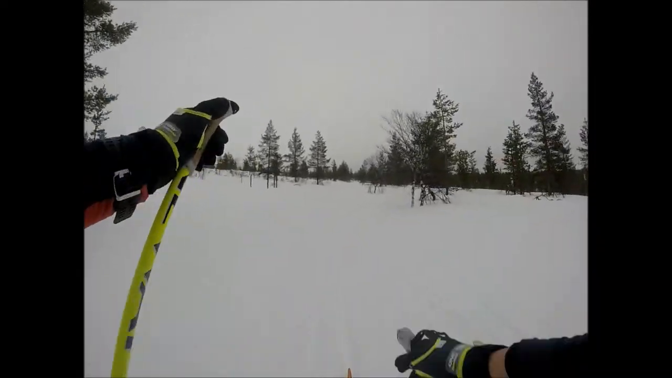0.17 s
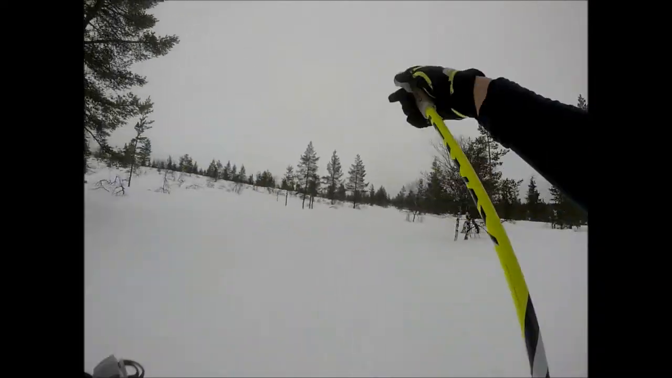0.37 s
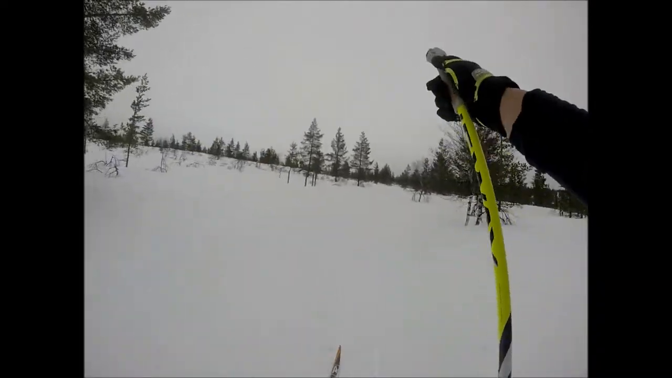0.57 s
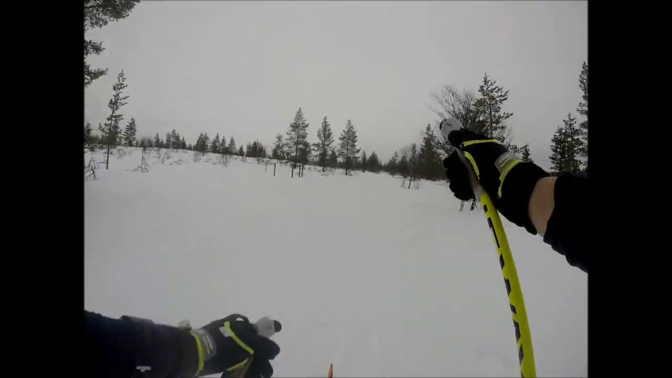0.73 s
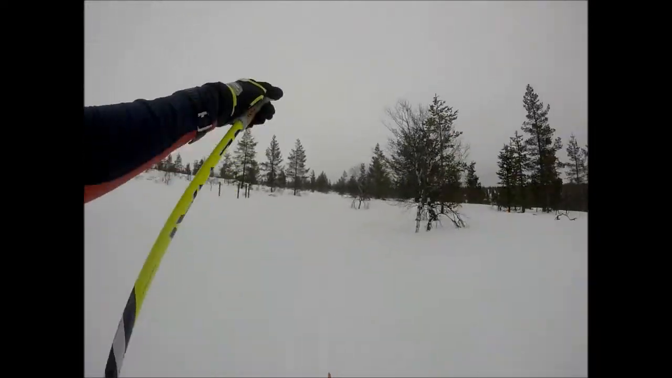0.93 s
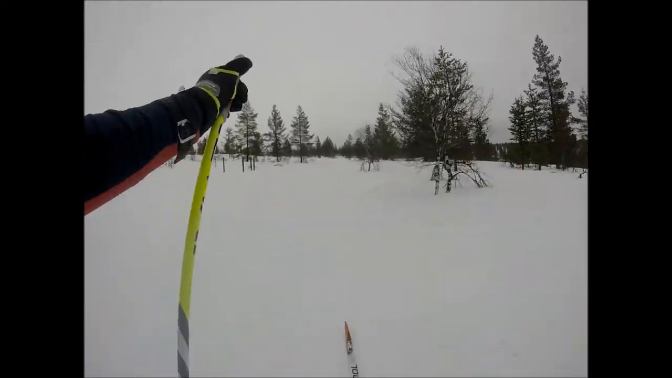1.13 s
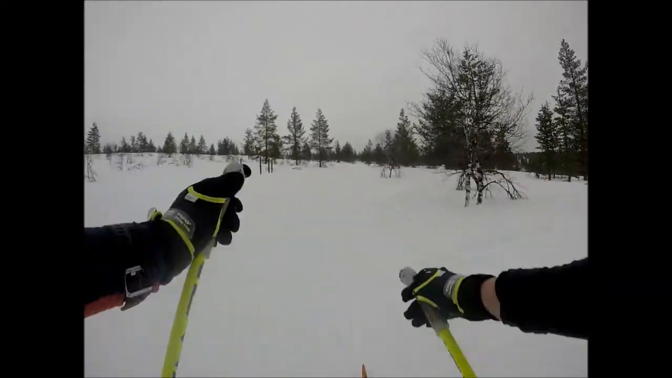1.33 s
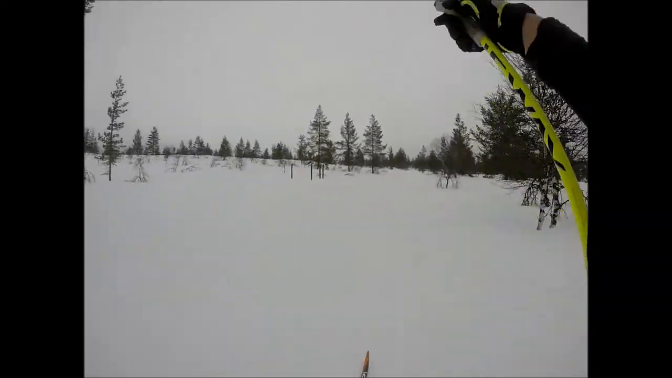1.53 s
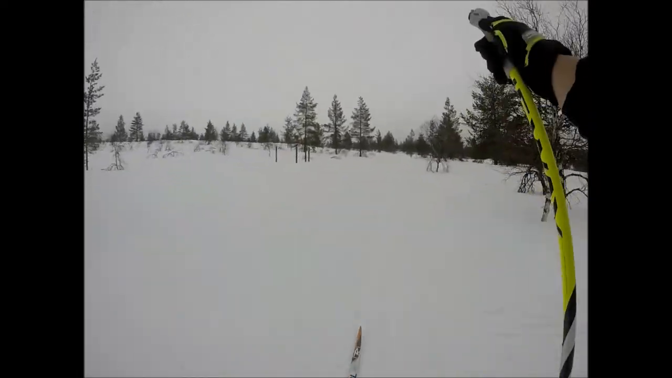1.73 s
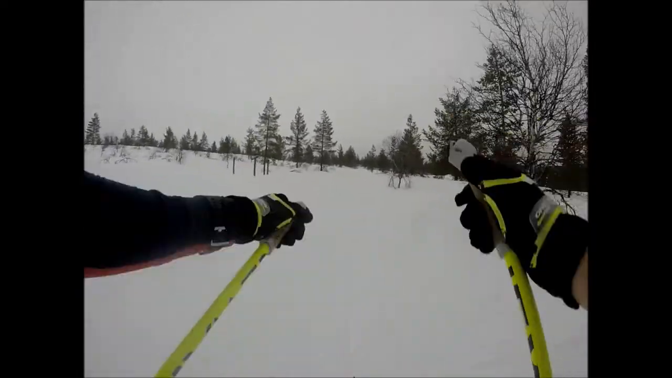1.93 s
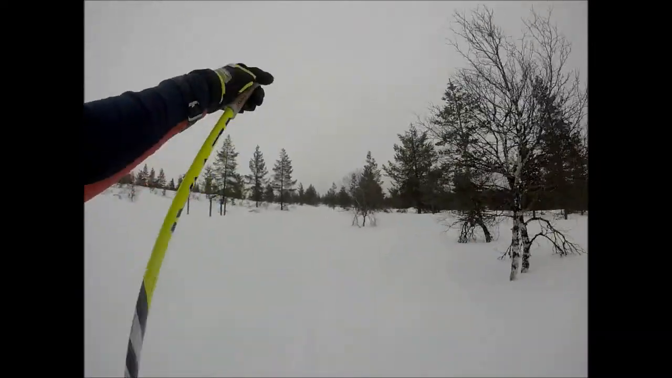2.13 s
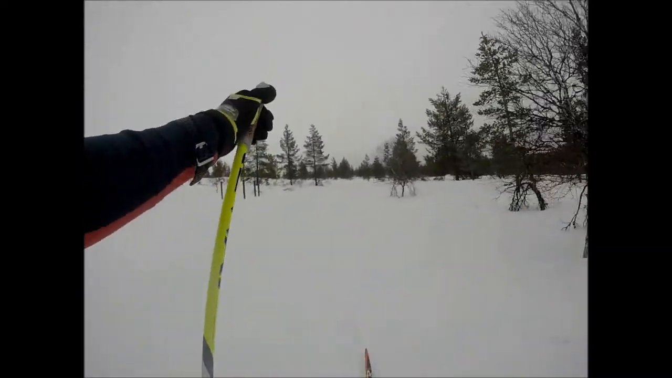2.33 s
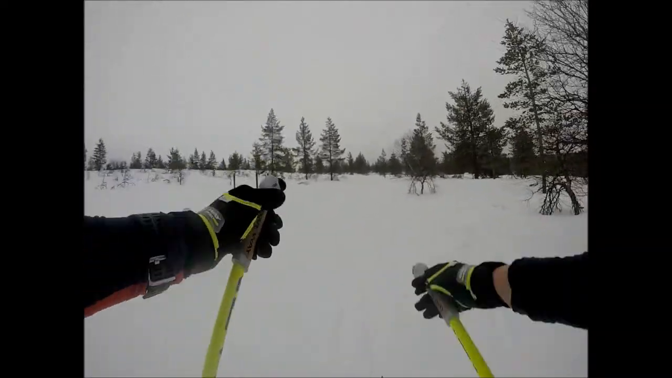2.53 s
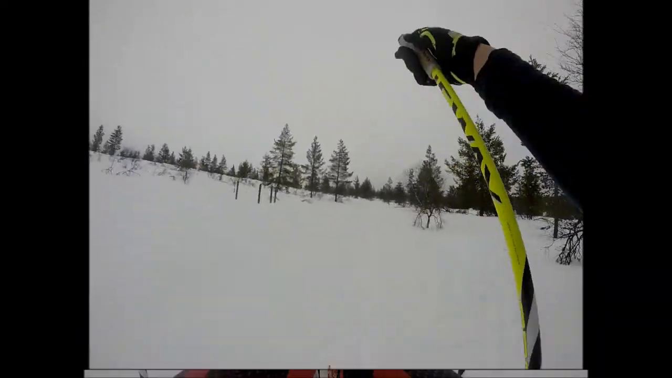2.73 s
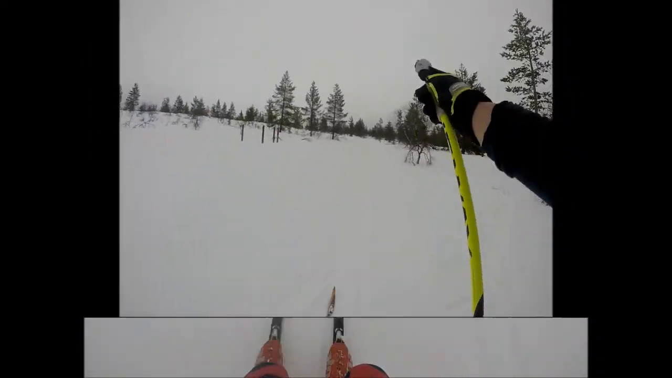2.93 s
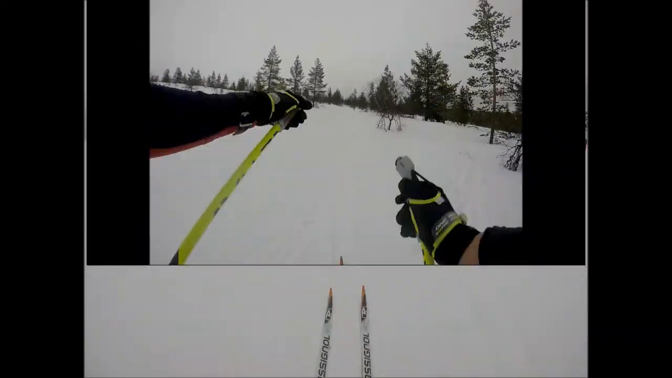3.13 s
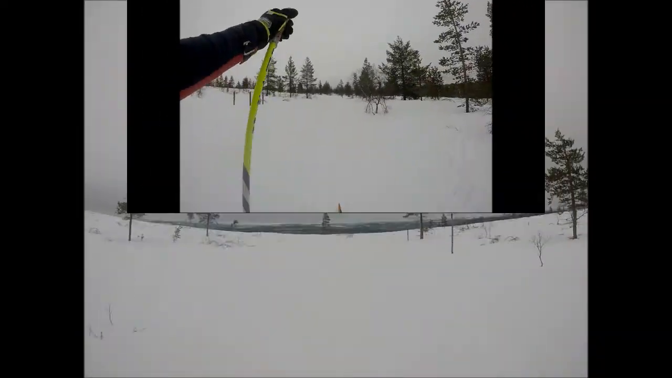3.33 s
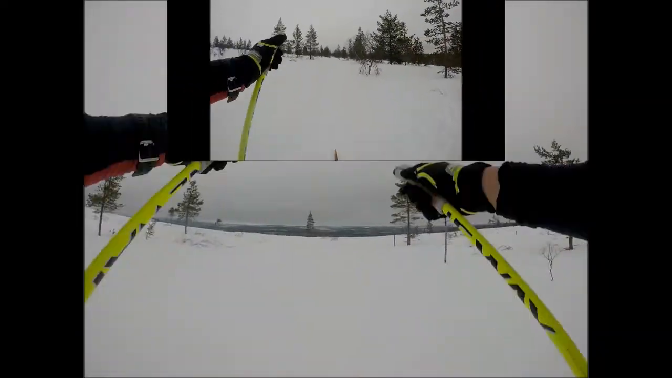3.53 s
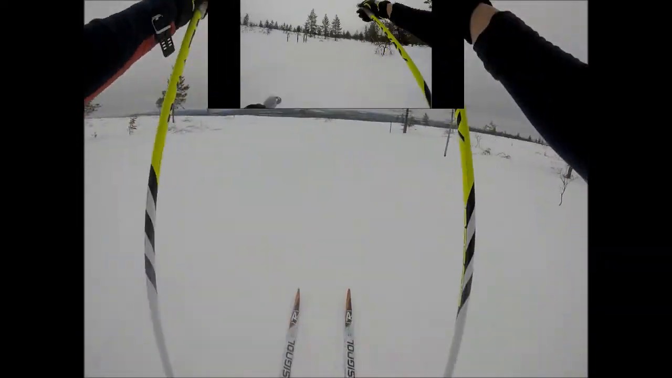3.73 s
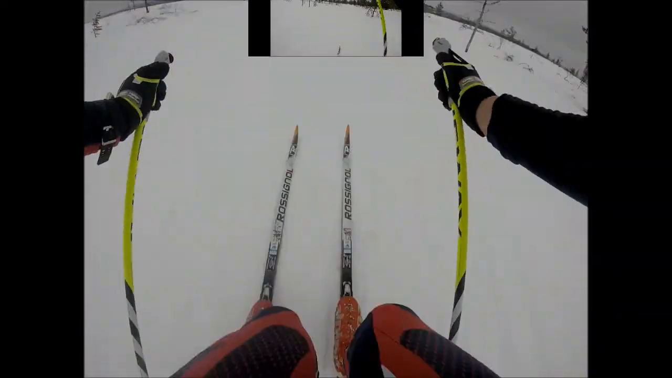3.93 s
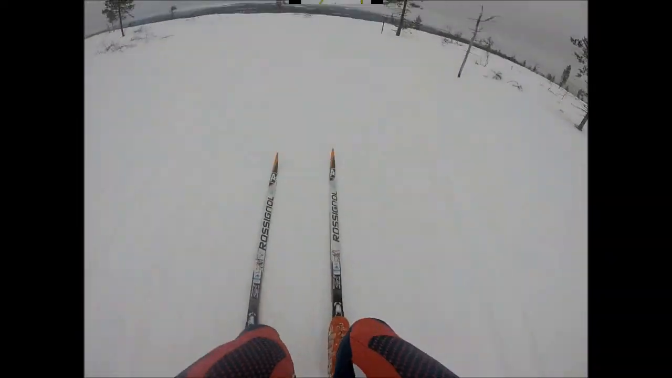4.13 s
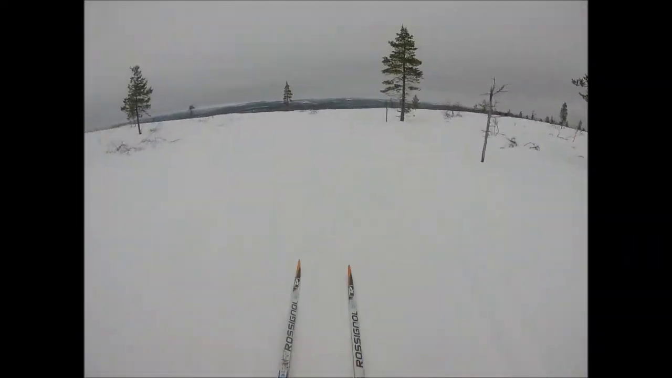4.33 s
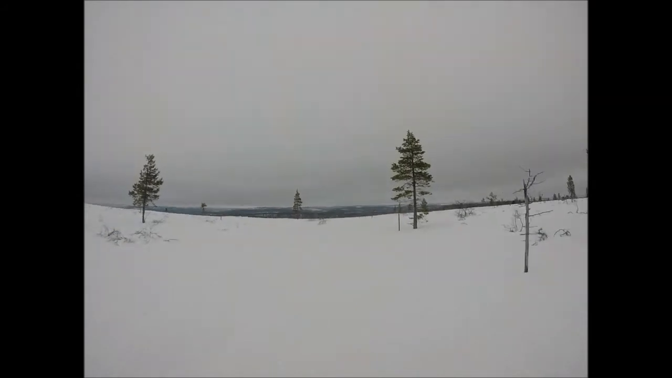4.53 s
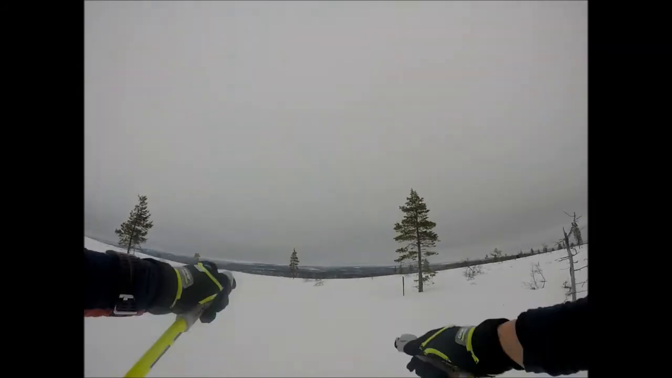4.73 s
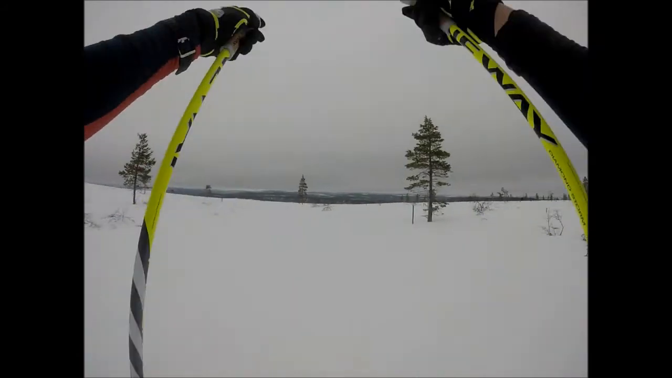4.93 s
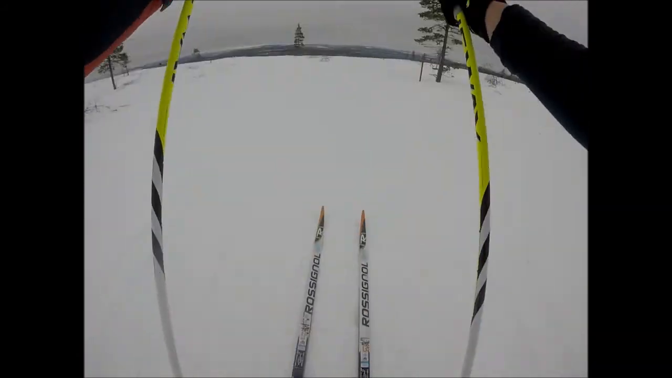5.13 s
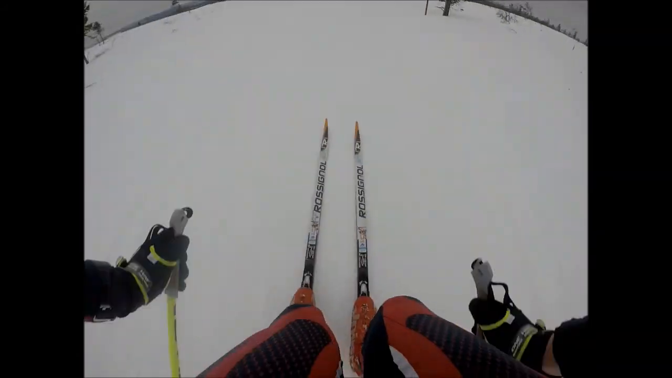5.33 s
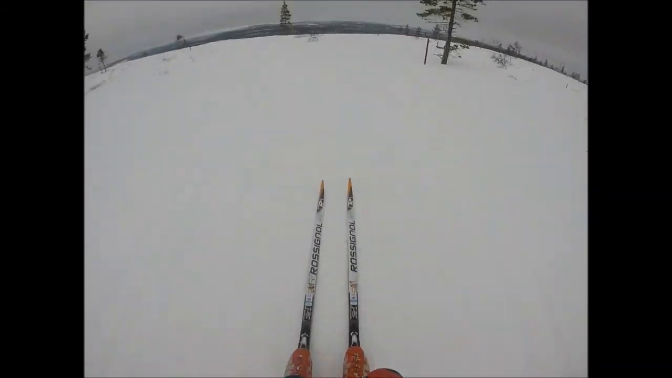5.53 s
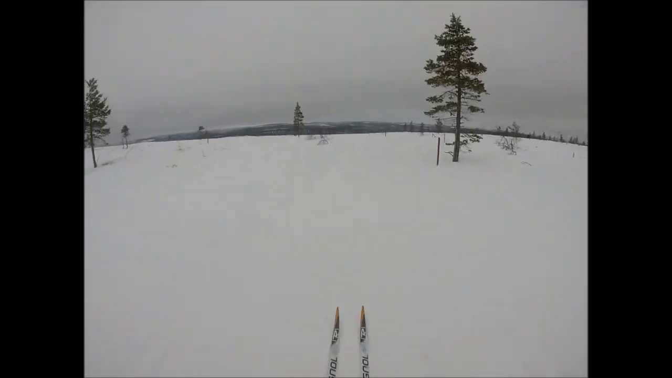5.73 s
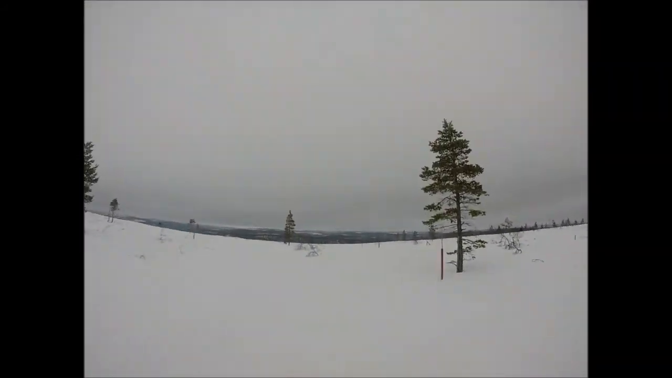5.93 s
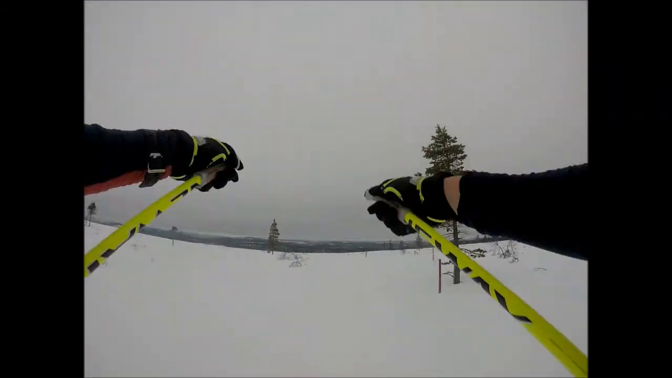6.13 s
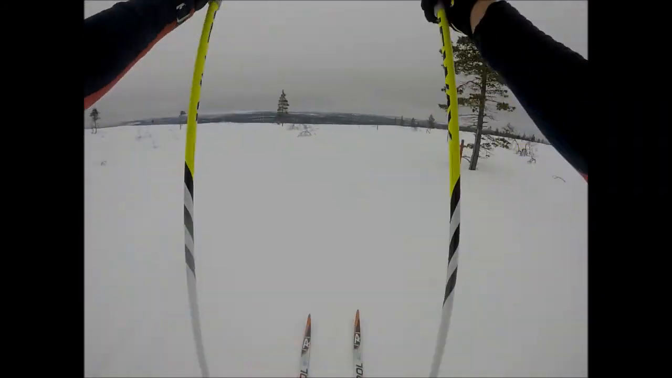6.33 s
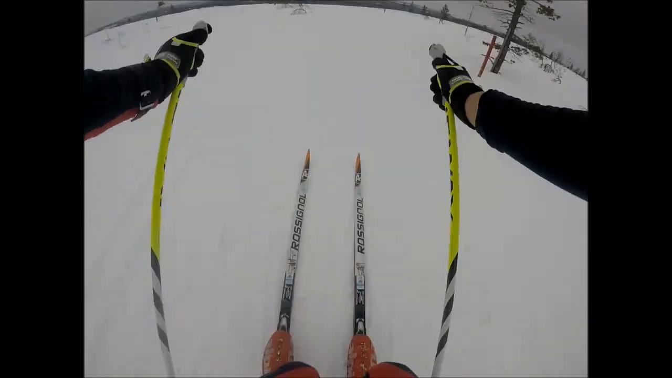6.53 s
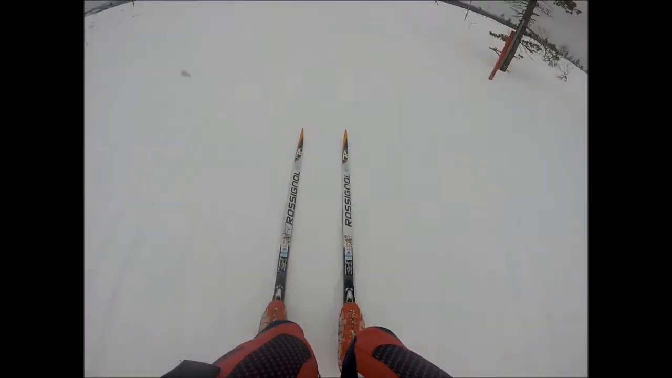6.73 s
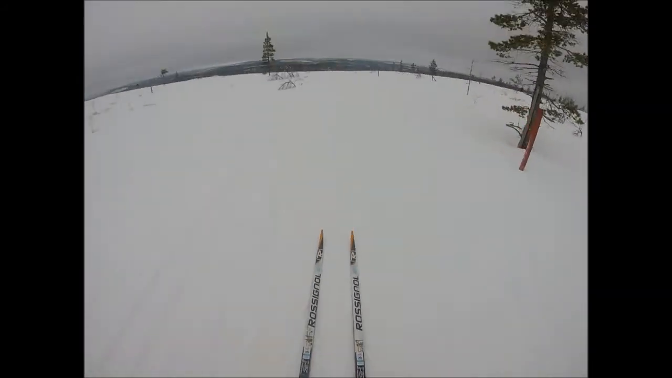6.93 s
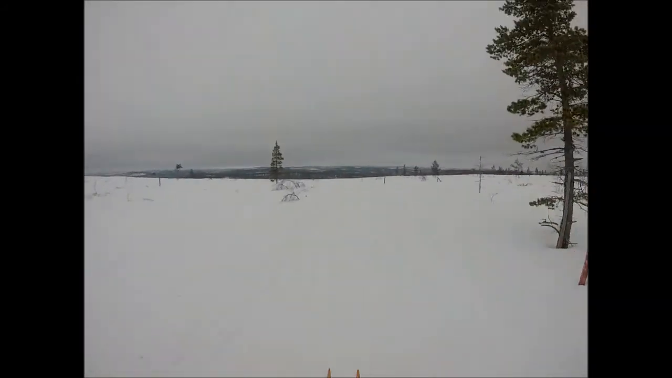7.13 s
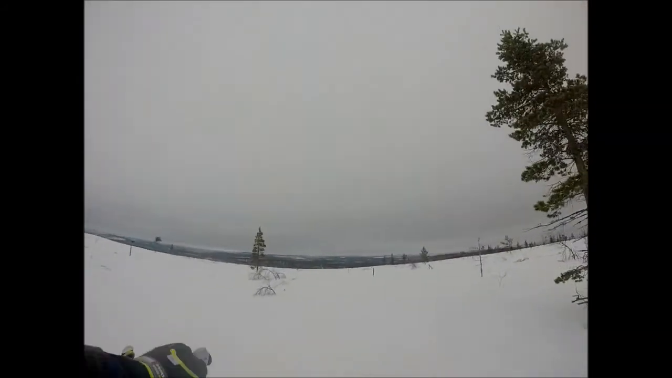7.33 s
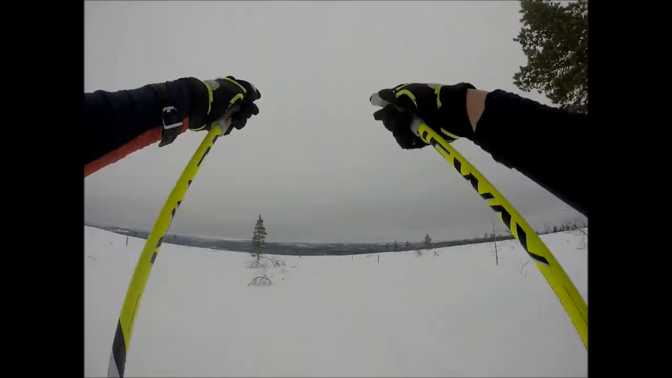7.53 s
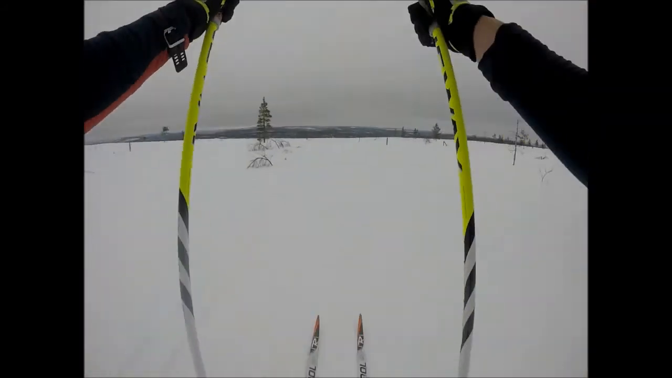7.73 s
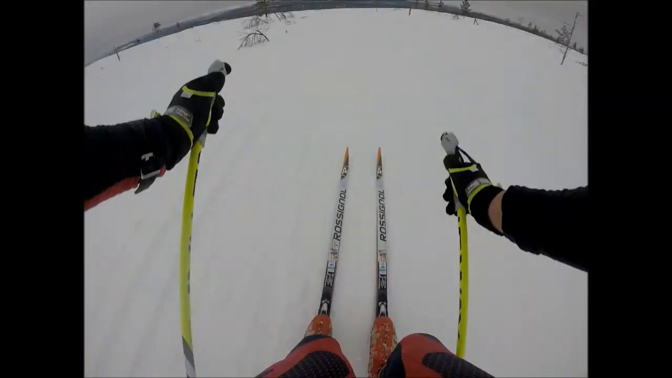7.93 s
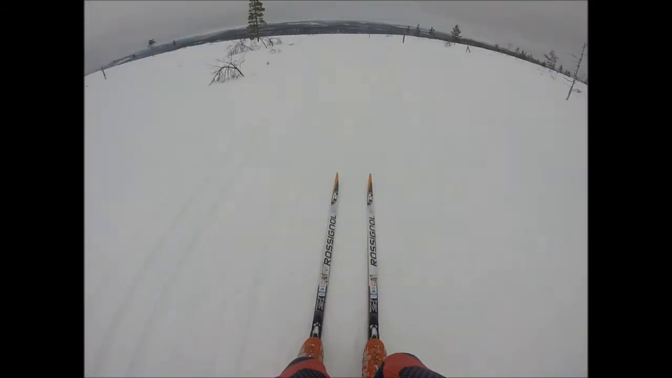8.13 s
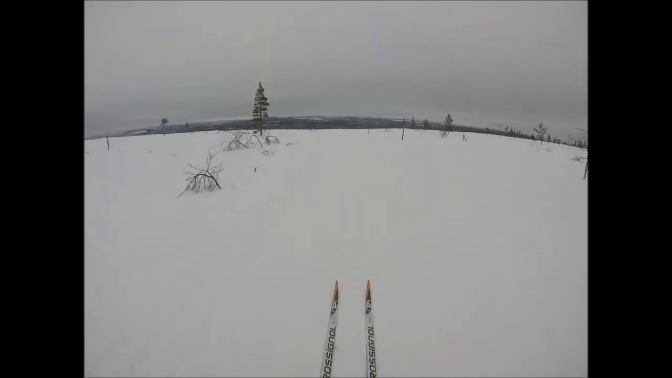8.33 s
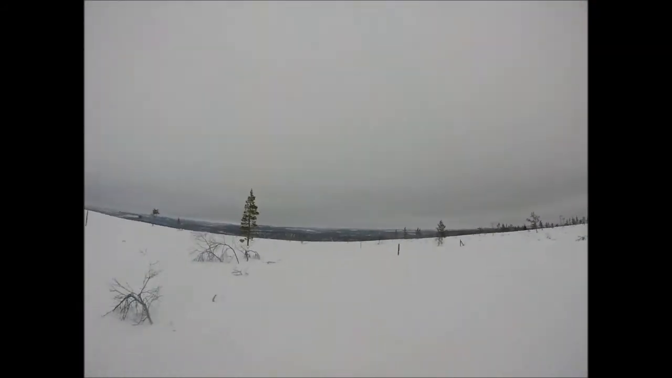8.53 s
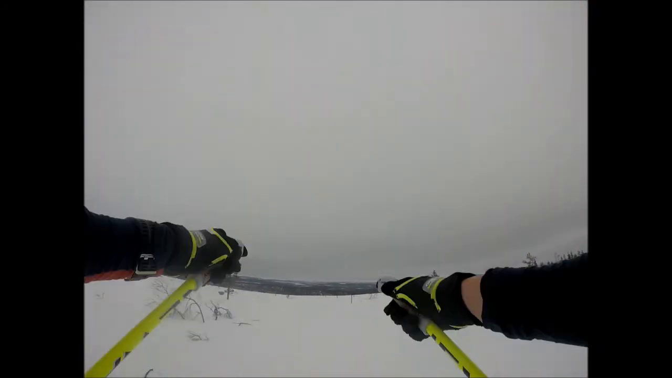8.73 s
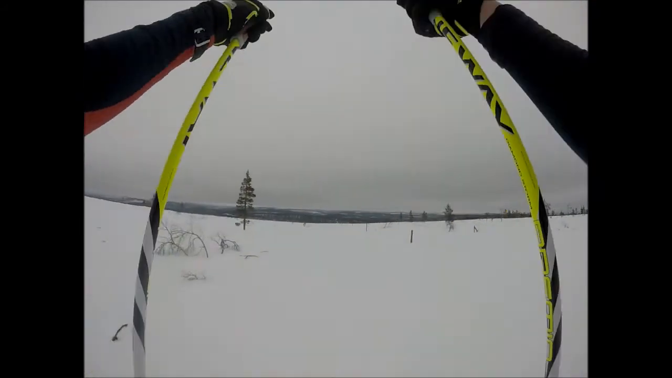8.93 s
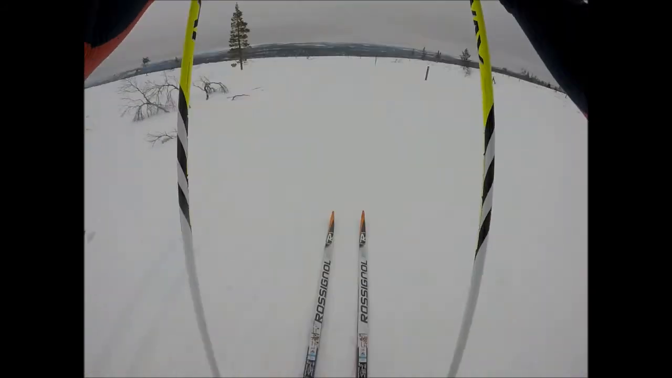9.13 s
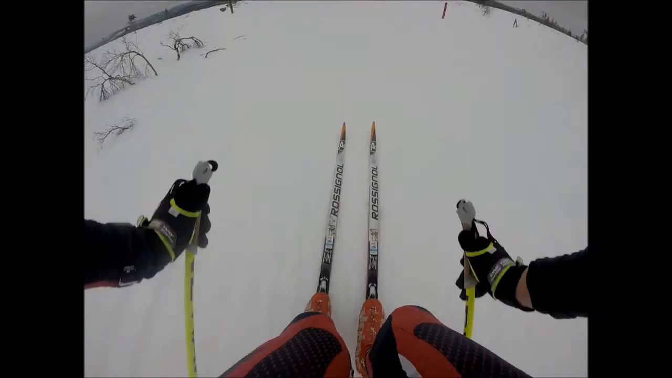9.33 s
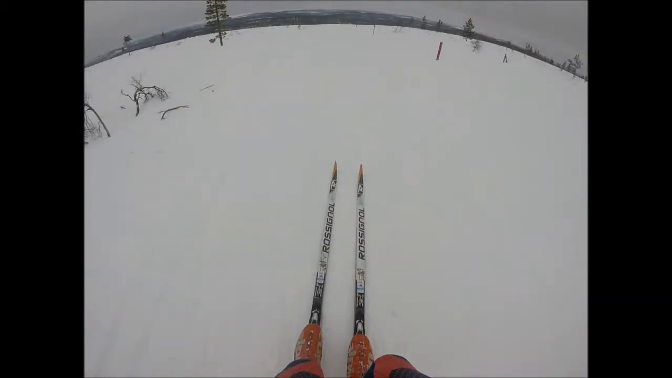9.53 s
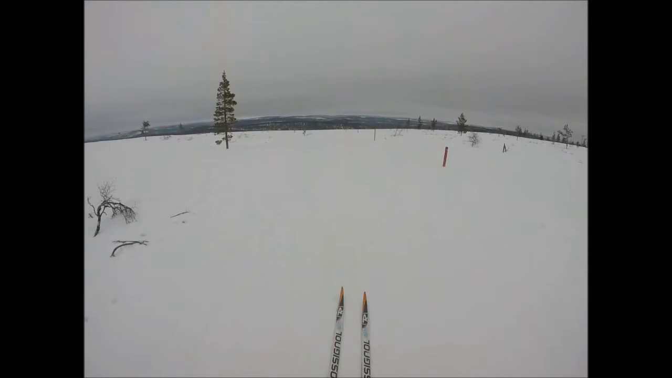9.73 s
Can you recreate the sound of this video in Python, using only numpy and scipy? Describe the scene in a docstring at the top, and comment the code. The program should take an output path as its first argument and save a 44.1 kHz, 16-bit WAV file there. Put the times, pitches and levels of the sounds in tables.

```python
"""Cross-country skis scrape, hiss and crackle along the track as a skier strides, then double-poles.
Pole tips and loaded skis crunch and squeak in the packed snow, and now and then the icy crust snaps.
Each hard push jolts a chest-strapped camera into a deep thud; gear knocks as the poles bite and lift.
Underneath, air sways against the camera and clothing rustles on its harness."""
import sys
import numpy as np
from scipy import signal
from scipy.fft import rfft, irfft, next_fast_len
from scipy.io import wavfile
from scipy.ndimage import uniform_filter1d, map_coordinates

SR = 44100
rng = np.random.default_rng(int(sys.argv[2]) if len(sys.argv) > 2 else 0)


def wav_record(signal):
    """Record a signal, one row per channel, as 16-bit PCM in the file named by sys.argv[1]."""
    frames = np.transpose(np.atleast_2d(signal))
    bounded = np.clip(frames, -1, 1)
    # unit amplitude maps onto the largest positive 16-bit level
    quanta = np.round(bounded * 32767).astype(np.int16)
    wavfile.write(sys.argv[1], SR, quanta)


N = 436149

# pushes on the poles: (time [s], effort [dB], glide hiss [dB], body movement [dB], length [s])
POLE_PUSHES = [(0.0, -2, -2, -16, 0.051), (0.517, -6, -14, -15, 0.0605), (1.07, -9, -5, -19.5, 0.096),
               (1.61, 1, -4, 3.5, 0.028), (2.255, -5.5, -1.5, -17, 0.066), (2.689, 0, 1, -1.5, 0.25),
               (3.26, -2, -3, -7, 0.097), (3.807, 1.5, -1, -1, 0.17), (5.16, -1, 1.5, -3, .15),
               (6.441, -2, -0.5, -1.5, 0.21), (7.827, 0, -0.5, -1.5, 0.18), (9.195, -6.5, -3.5, -4, 0.28)]
# colour of crunching snow, heard through the camera housing: (frequency [Hz], width [Hz], level [dB])
CRUNCH_MODES = [(1154, 120, -8.5), (1460, 150, 6), (1790, 84, 8), (2250, 480, 7), (3320, 350, 3.5),
                (3730, 280, -1.5), (4800, 430, -3), (5070, 520, -12), (6980, 510, -7.5), (7880, 360, -9.5),
                (10400, 3200, -25.5)]


def skis(crackle_top_hz=3000, snow_db=0.5):
    """The edges scrape, the bases swish and hiss; clumps of crystals crackle under the load."""
    # edges scraping under load: (frequency [Hz], level [dB])
    edge_spectrum = [(200, -10), (320, -7), (600, -10.5), (820, -9.5), (1000, -7), (1320, -2.5),
                     (1550, 0.5), (1850, -3.5), (2150, -10.5), (2600, -6), (4000, -70)]
    # bases swishing along the track: (frequency [Hz], level [dB])
    base_spectrum = [(1500, -43), (2100, -8), (2350, -0.5), (2580, 1), (3000, 0), (3330, -3.5),
                     (3650, -3.5), (4000, -8), (4600, -13), (8000, -70)]
    # fine snow hissing: (frequency [Hz], level [dB])
    powder_spectrum = [(2500, -42), (3900, -12), (4400, 4.5), (5250, -1.5), (5850, -1.5), (6400, 2.5),
                       (7100, 2.5), (7750, 5), (8300, 0.5), (9100, -6.5), (11000, -4.5), (12600, -13.5),
                       (14200, -11), (15400, -30)]
    firmness = amp(snow_db * wobble(15))  # softer and harder snow
    scrape_gain, swish_gain, hiss_gain, grit_gain = np.array(glide()) * firmness
    bumps = wobble(45)  # unevenness of the track, felt by the whole ski
    scrape = scrape_gain * amp(0.97 * bumps + 1.83 * wobble(130))
    scrape *= coloured(grains(N, rate=5000, spread_db=3), edge_spectrum)
    swish = swish_gain * amp(-3 + 1.8 * bumps)
    swish *= coloured(patchy(grains(N, rate=9000, spread_db=2.5), depth_db=0.4), base_spectrum)
    hiss = hiss_gain * amp(-3 + 1.3 * bumps + 1.3 * wobble(50))
    hiss *= coloured(patchy(rng.standard_normal(N), depth_db=2.5), powder_spectrum)
    clumps = grains(N, rate=170, spread_db=6) * amp(7 * wobble(30))
    clumps = filtered(clumps, lambda f: body(CRUNCH_MODES, f) / (1 + (f / crackle_top_hz) ** 4))
    crackle = scrape_gain * amp(-8.5) * unit(clumps)
    grit = grit_gain * gritty_ring(grains(N, rate=7000, spread_db=2), width_hz=550)
    return scrape + swish + hiss + crackle + grit


def glide():
    """Gains of scrape, swish, hiss and grit: all follow the pushes; the hiss lasts as the speed does."""
    # a ski slides out under shifting weight: (middle [s], half length [s], swish [dB], hiss [dB])
    slides = [(0.444, .03, -47, -50.5), (0.558, 0.043, -45.5, -48.5), (0.842, 0.022, -42.5, -42),
              (1.028, 0.032, -46, -48.5), (1.153, 0.011, -41, -47), (1.33, 0.016, -55, -59),
              (1.593, 0.1, -48, -49), (2.03, 0.12, -54, -52.5), (2.402, 0.021, -44.5, -53),
              (3.61, 0.11, -46.5, -67.5), (4.367, 0.037, -44.5, -51), (4.735, 0.013, -42, -72),
              (4.6, 0.07, -52, -53), (4.913, .06, -48, -58), (5.678, 0.04, -43.5, -61),
              (6.18, 0.11, -51.5, -65), (6.95, 0.056, -45, -56), (7.408, 0.11, -53.5, -68),
              (8.291, 0.026, -42.5, -51), (8.795, 0.041, -48, -58), (8.916, 0.031, -44, -67.5),
              (9.691, 0.028, -42.5, -54)]
    s, half, swish_db, hiss_db = np.transpose(slides)
    _, effort_db, speed_db, *_ = np.transpose(POLE_PUSHES)
    load = pushing(effort_db, lasting=1.48)
    speed = pushing(speed_db, lasting=5.06)
    slide = swells(s, half, swish_db)
    scrape = together(amp(-55), amp(-47.5) * load, amp(-5) * slide)  # steady bed, pushes, slides
    swish = together(amp(-53), amp(-44) * load, slide)
    hiss = together(amp(-55.5), amp(-50) * speed, swells(s, half, hiss_db))
    grit = amp(-54) * pushing(speed_db, lasting=2)
    return scrape, swish, hiss, grit


def crunches(split_hz=3900, clumping_db=2.4, ring_db=-4):
    """Packed snow gives way in clumps of tiny slips; some of them lock into a squeak."""
    # snow crushed under pole tips and skis:
    # (time [s], length [s], level [dB], relative treble [dB], squeak [Hz], squeak share [0-1])
    loud_crunches = [(0.003, 0.014, -25, -19, 2355, 0.83), (0.532, 0.028, -34, -10.5, 3110, 0.78),
                     (0.675, .045, -40, -18, 1700, .3), (1.091, 0.03, -27.5, -15, 2450, 0.4),
                     (1.3, 0.035, -42.5, -0.5, 2190, 0.16), (1.365, 0.03, -38.5, -14, 1525, 0.2),
                     (1.6438, 0.014, -24.5, -10.5, 3040, 0.82), (2.265, 0.015, -29, -10.5, 2334, 0.68),
                     (2.854, 0.027, -35.5, -9, 3100, 0.92), (2.983, 0.0066, -26.5, -11.5, 2400, 0),
                     (3.1, 0.0056, -33.5, -25, 2610, 0.06), (3.139, .025, -39, -24, 1574, .4),
                     (3.288, 0.0065, -28.5, -23, 2180, .3), (3.345, .008, -36, -18, 1500, 0.02),
                     (3.397, 0.029, -30, -11, 2447, 0.4), (3.748, 0.032, -34, -9.5, 2510, 0.4),
                     (3.892, 0.0051, -30.5, -10, 2180, .1), (3.917, 0.0086, -22.5, -11.5, 2130, 0.23),
                     (3.928, 0.03, -32.5, -8.5, 3150, 0.7), (4.058, 0.013, -33.5, -15, 2370, 0.1),
                     (4.282, .008, -30.5, -31, 1473, .85), (4.482, 0.011, -36.5, -17, 1480, .5),
                     (5.083, 0.028, -32, -8, 3060, 0.7), (5.192, 0.0064, -30.5, -25, 2220, 0),
                     (5.243, 0.014, -26, -15.5, 1816, 0.23), (5.329, 0.0073, -29.5, -28, 2250, 0.3),
                     (5.469, 0.011, -37.5, -13, 1397, 0.9), (5.808, .006, -41, -15, 1840, .6),
                     (5.835, .014, -34, -34.5, 1490, 0.47), (6.37, 0.027, -31.5, -10.5, 2930, .45),
                     (6.547, 0.0065, -21.5, -11, 2200, 0), (6.566, .006, -28.5, -24, 2190, .6),
                     (6.609, 0.016, -30, -17, 2170, 0), (6.644, .004, -33.5, -22, 1420, 0.7),
                     (6.681, 0.0052, -30, -21.5, 1460, 0.47), (6.915, .004, -36, -20, 2240, .1),
                     (7.106, 0.011, -38.5, -16, 1490, 0.57), (7.161, 0.005, -38, -15, 2270, 0.5),
                     (7.746, 0.03, -37, -8, 3080, .55), (7.846, 0.021, -35, -12, 1466, .25),
                     (7.878, 0.011, -30, -14, 1810, .3), (7.8917, 0.0054, -20, -18.5, 1510, 0.18),
                     (7.982, 0.0065, -29.5, -20, 1500, 0.15), (8.156, .003, -35, -20, 1400, .6),
                     (8.452, .016, -37, -38, 1420, 0.66), (8.465, .005, -35, -30, 1850, 0.5),
                     (8.571, 0.0069, -38, -19, 1440, 0.15), (9.089, .03, -31.5, -11, 2990, 0.53),
                     (9.225, .01, -38, -9, 2250, .2), (9.246, .023, -42, -8, 1530, .2),
                     (9.286, .003, -34, -8, 1510, 0.4), (9.311, 0.01, -32.5, -13, 2305, .4),
                     (9.354, 0.027, -36.5, -25, 1810, .35), (9.813, 0.031, -34.5, -19, 1530, 0.5),
                     (9.873, 0.0051, -29, -28, 1560, 0.92)]
    out, t = np.zeros(N), np.arange(SR // 6) / SR
    lowpass = lambda f: 1 / (1 + (f / split_hz) ** 10)
    for s, length, db, treble_db, squeak_hz, share in loud_crunches + faint_crunches():
        rise = 1 - np.exp(-t / (0.3 * length))
        fade = np.exp(-(t / (0.8 * length)) ** 1.6)
        clumps = amp(clumping_db * unit(uniform_filter1d(rng.standard_normal(len(t)), size=150)))
        load = rise * clumps * fade
        slips = load * grains(len(t), rate=15000, spread_db=4.5)
        crush = unit(filtered(slips, lambda f: body(CRUNCH_MODES, f) * lowpass(f)))
        spray = unit(filtered(slips, lambda f: body(CRUNCH_MODES, f) * (1 - lowpass(f))))
        spray += amp(ring_db) * gritty_ring(load * grains(len(t), rate=13000, spread_db=2), width_hz=170)
        tone = unit(load * squeak(t, squeak_hz))
        burst = np.sqrt(1 - share) * crush + np.sqrt(share) * tone + amp(treble_db) * spray
        add(out, s, amp(db) * np.sqrt(length / t[-1]) * burst)  # level holds over the crunch's length
    return out


def faint_crunches(idle_per_s=1.5, loaded_per_s=8, treble_db=-15, squeak_share=0.25, tries=200):
    """Rows for the small chance crumbles between the loud crunches: more and louder under load."""
    # pitches a crumble can squeak at: (frequency [Hz])
    squeak_pitches = [1464, 1835, 2264]
    load = pushing(np.transpose(POLE_PUSHES)[1], lasting=1.8)
    rows = []
    for when, chance, size, pitch, span in rng.random((tries, 5)):
        weight = load[int(when * N)]
        if chance < (idle_per_s + loaded_per_s * weight) * N / SR / tries:
            length = 0.006 * 2 ** (2 * span - 1)  # 3 to 12 ms
            db = -44 + 5 * weight + 3 * (2 * size - 1)
            squeak_hz = squeak_pitches[int(pitch * len(squeak_pitches))]
            rows.append((when * N / SR, length, db, treble_db, squeak_hz, squeak_share))
    return rows


def squeak(t, hz, waver=0.0524, overtone_db=-19):
    """Regular stick and slip: a wavering tone with a weak octave, rms 1."""
    drift = unit(uniform_filter1d(rng.standard_normal(len(t)), size=90))
    phase = 2 * np.pi * np.cumsum(hz * (1 + waver * drift)) / SR
    return unit(np.sin(phase) + amp(overtone_db) * np.sin(2 * phase))


def gritty_ring(x, width_hz, hz=5100):
    """Give snow grains a high, gritty ring, rms 1."""
    return unit(filtered(x, lambda f: resonance(f, hz, width_hz) * resonance(f, hz, 10 * width_hz)))


def crust_snaps(hz=7900, width_hz=3600, t60_s=0.009):
    """The icy crust snaps under a pole in a brief bright spray of breaking crystals."""
    # breaks in the crust: (time [s], level [dB])
    breaks = [(6.55, -23), (6.5754, -20), (7.8926, -16)]
    out, t = np.zeros(N), np.arange(SR // 20) / SR
    for s, db in breaks:
        burst = amp(-60 * t / t60_s) * rng.standard_normal(len(t))
        add(out, s, amp(db) * filtered(burst, lambda f: resonance(f, hz, width_hz) ** 2))
    return out


def mount_thuds():
    """A cushioned jolt rocks the camera on its mount; harder jolts are shorter."""
    # jolts of the mount: (time [s], impulse [dB], hardness [Hz])
    jolts = [(0.5822, 46.5, 205), (1.7112, 52, 393), (2.7285, 52, 370), (2.9237, 50, 298),
             (3.9873, 56, 340), (5.3113, 52, 330), (6.5956, 53.5, 305), (7.9378, 45, 250),
             (9.3125, 54, 290)]
    # the camera rocking on its harness: (frequency [Hz], width [Hz], gain [signed by direction])
    mount_modes = [(23.4, 19.8, 0.22), (86.5, 53.4, 0.6), (207, 136, -0.22)]
    out, impulse = np.zeros(N), signal.unit_impulse(SR // 4)
    rocking = lambda f: sum(gain * resonance(f, hz, width) for hz, width, gain in mount_modes)
    for s, db, hard_hz in jolts:
        add(out, s, amp(db) * filtered(impulse, lambda f: rocking(f) / (1 + 1j * f / hard_hz) ** 4))
    return out


def gear_knocks(seat_s=0.0009, bounce_s=0.00268, rattle_t60_s=0.094, contact_hz=4600, bass_hz=450):
    """Each knock touches, seats, bounces once and rattles a little, all ringing the gear."""
    # hits on the gear: (time [s], impulse [dB], relative bounce [dB], bass shelf [dB])
    hits = [(2.1077, -2.5, -7, -6), (2.9876, 7.5, -6.5, -3), (3.8336, 22, -7.5, -2), (4.0726, 7.5, -6, 5),
            (4.13, 6, -2, 1), (4.282, 3, -3, -4), (4.5915, -0.5, -13, 3), (5.158, 19, -11.5, -1),
            (5.475, 0.5, -6, 3), (5.7763, -3, -3.5, 5), (5.888, -1.5, -9, 8), (6.449, 18.5, -8.5, -0.5),
            (6.8046, 12, -1, -6), (7.187, -1.5, -8, 6), (7.827, 18, -7, 1), (8.0407, 3, -3, -6),
            (8.2101, 13.5, -3, -0.5), (8.5087, 0, -9, 2), (9.1614, 20, -8, 0), (9.4718, 11.5, -0.5, 2),
            (9.5994, -2, -6, 4)]
    # the ring of the gear: (frequency [Hz], width [Hz], level [dB])
    gear_modes = [(137, 35, 3), (297, 91, -1.5), (565, 145, -5.5), (988, 73, -6.5), (1267, 89, -3.5),
                  (1706, 120, 3), (2420, 445, 1), (2584, 530, -0.5), (3660, 140, -12), (4500, 410, -28),
                  (7640, 710, -28)]
    blows, t = np.zeros(N), np.arange(SR // 10) / SR
    for s, db, bounce_db, bass_db in hits:
        blow = amp(-36 - 60 * t / rattle_t60_s) * rng.standard_normal(len(t))  # rattle
        blow[0] += 1  # first touch
        blow[round(seat_s * SR)] += amp(-4)
        blow[round(bounce_s * SR)] += amp(bounce_db + rng.normal(0, 3.8))
        bass_shelf = lambda f: 1 + (amp(bass_db) - 1) / (1 + 1j * f / bass_hz)
        add(blows, s, amp(db) * filtered(blow, bass_shelf))
    # a blunt contact gives little treble
    return filtered(blows, lambda f: body(gear_modes, f) / np.sqrt(1 + (f / contact_hz) ** 4))


def air_and_cloth():
    """Air sways against the camera and clothing rubs its harness; both grow with each push and lurch."""
    # lurches of the skier's chest: (middle [s], half length [s], sway [dB], rustle [dB])
    lurches = [(0.198, .025, -32.5, -65), (0.846, 0.02, -30, -55), (1.17, 0.034, -34.5, -50),
               (1.47, 0.015, -35, -53), (1.775, .03, -34, -58), (2.111, .02, -32.5, -49),
               (2.423, 0.02, -34, -71.5), (3.107, 0.03, -32.5, -48), (3.385, 0.026, -32, -52),
               (3.713, 0.027, -29, -46), (4.37, .03, -36, -48), (4.706, .03, -39.5, -49.5),
               (4.837, 0.032, -37.5, -57), (5.674, 0.023, -37.5, -46), (6.329, 0.012, -26.5, -39),
               (7.0, .025, -47, -44), (7.288, 0.047, -37.5, -45), (7.615, 0.012, -30, -65),
               (8.167, 0.026, -37.5, -41), (8.287, 0.024, -40, -45), (8.57, 0.027, -36, -43.5),
               (8.92, 0.028, -29.5, -44), (9.598, 0.034, -36, -45)]
    # slow sway of air: (frequency [Hz], level [dB])
    air_spectrum = [(8, 7), (17, 4), (32, 4), (60, -1.5), (90, -10.5), (150, -42), (400, -85)]
    # rustle of cloth: (frequency [Hz], level [dB])
    cloth_spectrum = [(40, -35), (85, 3.5), (130, -2), (200, -7.5), (290, -17), (420, -26.5), (900, -42)]
    s, half, sway_db, rustle_db = np.transpose(lurches)
    movement = pushing(np.transpose(POLE_PUSHES)[3], lasting=2.54)
    lumps = wobble(22)
    sway_bed = amp(2.65 * lumps) * together(amp(-47), amp(-40.5) * movement)
    rustle_bed = amp(2.6 * lumps) * together(amp(-57), amp(-44) * movement)
    air = coloured(rng.standard_normal(N), air_spectrum)
    cloth = coloured(rng.standard_normal(N), cloth_spectrum)
    sway = air * together(sway_bed, swells(s, half, sway_db))
    rustle = cloth * together(rustle_bed, swells(s, half, rustle_db))
    return sway + rustle


def pushing(levels_db, lasting, attack_s=0.043):
    """Gain of all pushes: weight comes onto the poles, holds, then fades over lasting times the length."""
    t, power = np.arange(N) / SR, np.zeros(N)
    for (s, *_, length), db in zip(POLE_PUSHES, levels_db):
        rise = np.clip((t - s) / attack_s, 0, 1)
        fade = np.exp(-np.maximum(t - s - length, 0) / (lasting * length))
        power += (amp(db) * rise * fade) ** 2
    return np.sqrt(power)


def swells(times, half_lengths, levels_db):
    """Gain of a series of bell-shaped swells."""
    t = np.arange(N) / SR
    return sum(amp(db) * np.exp(-np.minimum(((t - s) / half) ** 2 / 2, 50))
               for s, half, db in zip(times, half_lengths, levels_db))


def grains(size, rate, spread_db):
    """Breaking snow crystals: random ticks of uneven strength, rate a second, rms 1."""
    hit = rng.random(size) < rate / SR
    polarity = np.sign(rng.standard_normal(size))
    strength = amp(spread_db * np.clip(rng.standard_normal(size), -2, 2))
    return unit(hit * polarity * strength)


def patchy(x, depth_db):
    """Let the colour of a noise drift in patches of time and frequency."""
    spectra = signal.stft(x, nperseg=512)[2]
    patches = uniform_filter1d(rng.standard_normal(spectra.shape), size=9, axis=0)
    patches = unit(uniform_filter1d(patches, size=12, axis=1))
    return unit(signal.istft(spectra * amp(depth_db * patches), nperseg=512)[1][:N])


def wobble(rate):
    """A smooth random curve, rate knots a second."""
    return map_coordinates(rng.standard_normal(int(N * rate / SR) + 4), [np.arange(N) * rate / SR])


def body(modes, f):
    """Response of an object with several modes of alternating polarity."""
    return sum((-1) ** k * amp(db) * resonance(f, hz, width) for k, (hz, width, db) in enumerate(modes))


def resonance(f, centre, width):
    """Causal response of one damped mode."""
    return 1j * f * width / (centre ** 2 - f ** 2 + 1j * f * width)


def coloured(x, spectrum):
    """x shaped by (Hz, dB) points, at rms 1."""
    f, db = np.transpose(spectrum)
    return unit(filtered(x, lambda hz: amp(np.interp(np.log(hz + 1), np.log(f + 1), db))))


def filtered(x, response):
    """x through a complex frequency response."""
    size = next_fast_len(len(x) + 8192)
    return irfft(rfft(x, size) * response(np.fft.rfftfreq(size, 1 / SR)), size)[:len(x)]


def together(*gains):
    """Gains of unrelated sounds add in power."""
    return np.sqrt(sum(g ** 2 for g in gains))


def add(track, s, sound):
    """Mix a sound into the track at time s."""
    i = max(0, round(s * SR))
    track[i:i + len(sound)] += sound[:N - i]


def amp(db):
    """Decibels to gain."""
    return 10 ** (np.asarray(db) / 20)


def unit(x):
    """Scale to rms 1."""
    return x / np.sqrt(np.mean(x ** 2) + 1e-20)


def scene():
    """Open snow gives no echo: everything arrives directly, in mono."""
    return (mount_thuds() + gear_knocks() + skis() + air_and_cloth() + crust_snaps() + crunches())[None]


def record(dry):
    """The hardest thuds saturate the microphone near full scale; nothing passes above the band limit."""
    ceiling, top_hz = 1.03, 15500
    rounded = dry / (1 + np.abs(dry / ceiling) ** 10) ** 0.1
    return np.array([filtered(channel, lambda hz: hz < top_hz) for channel in rounded])


dry = scene()
out = record(dry)
wav_record(out)
```